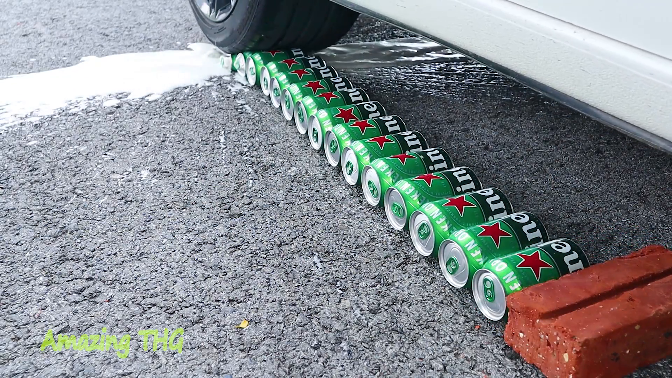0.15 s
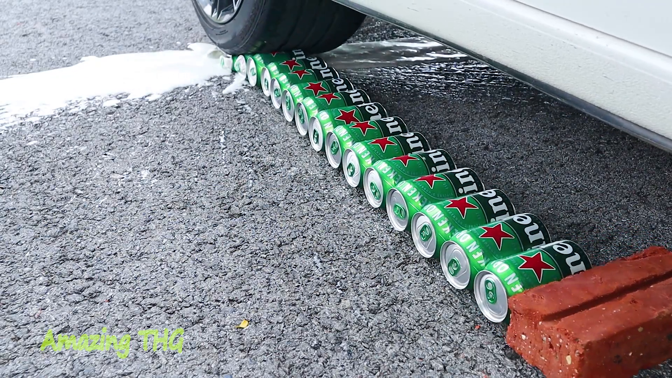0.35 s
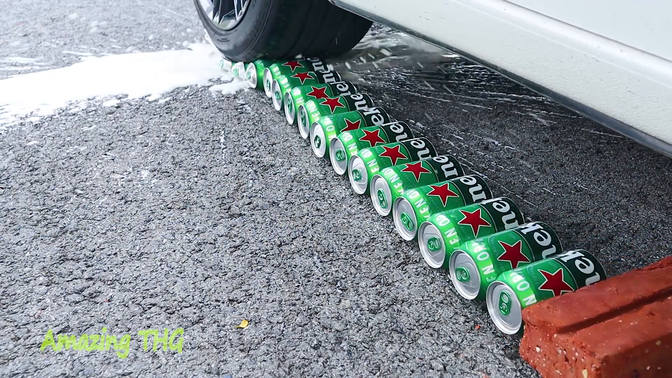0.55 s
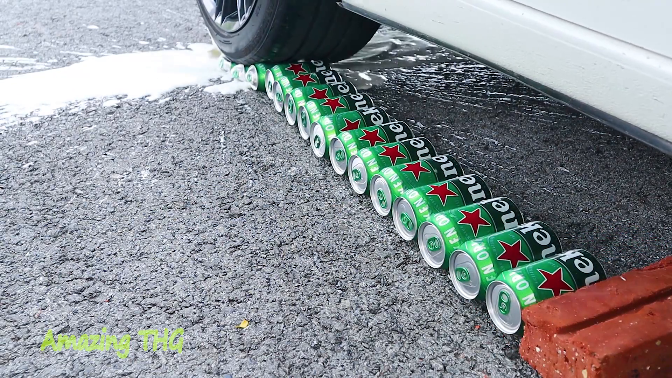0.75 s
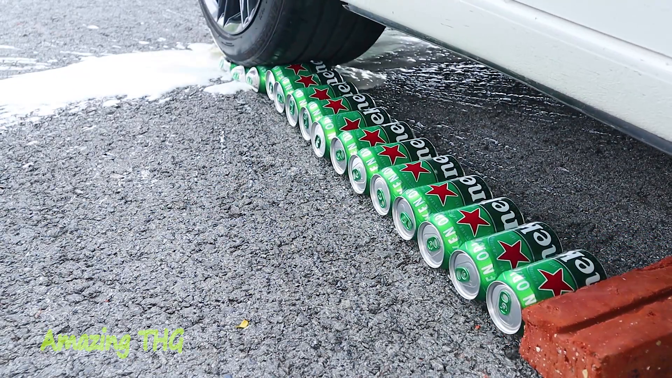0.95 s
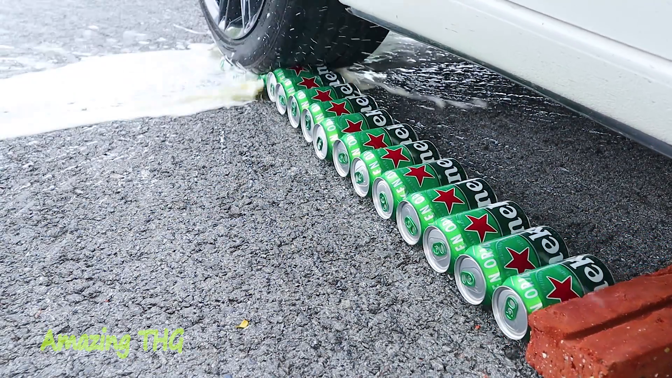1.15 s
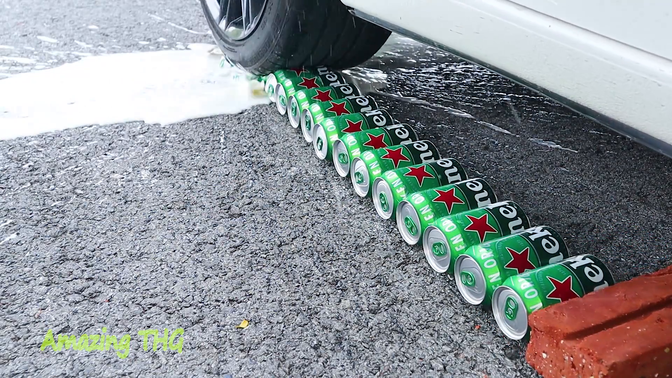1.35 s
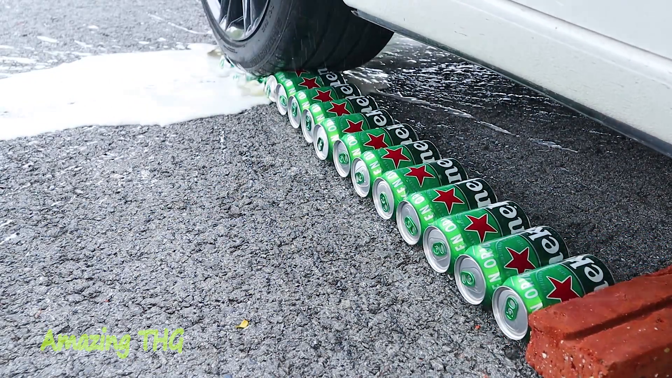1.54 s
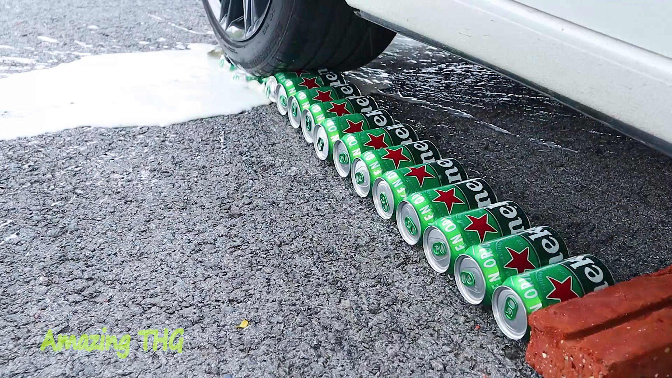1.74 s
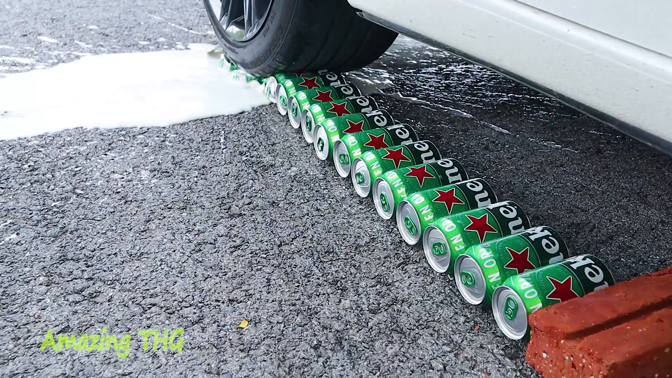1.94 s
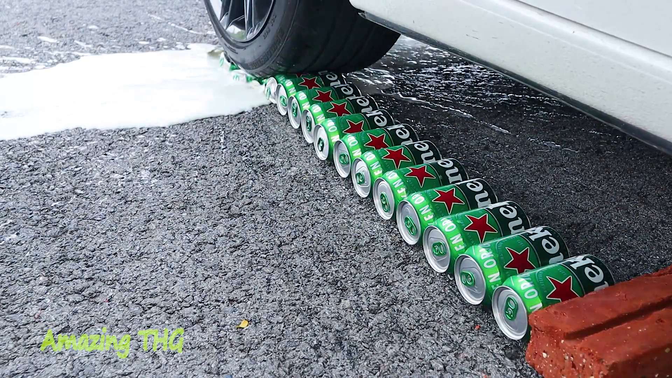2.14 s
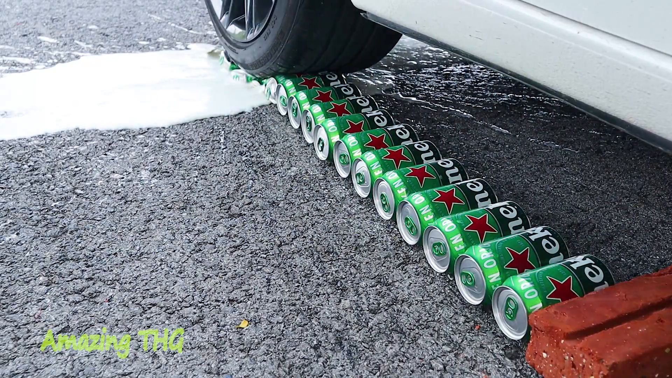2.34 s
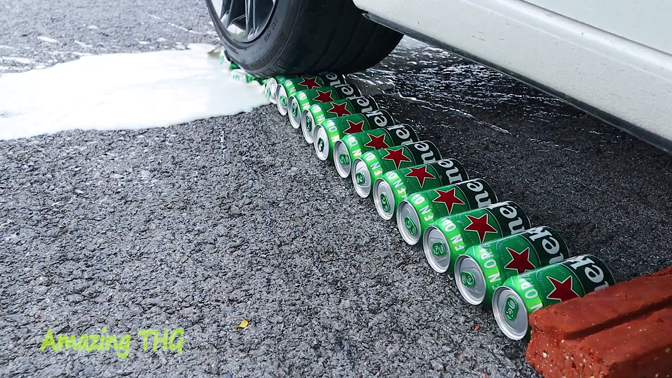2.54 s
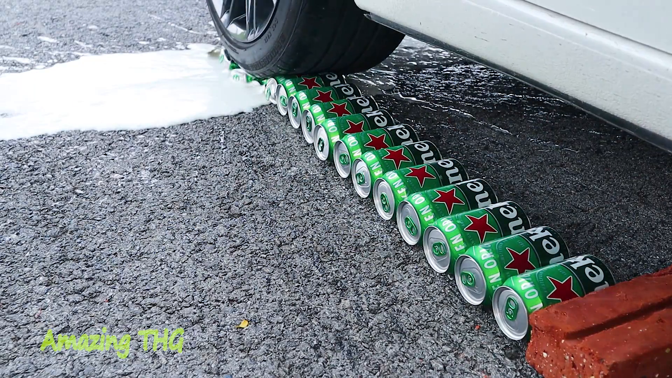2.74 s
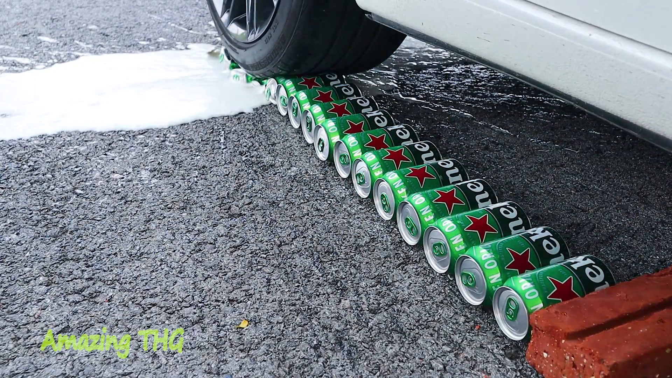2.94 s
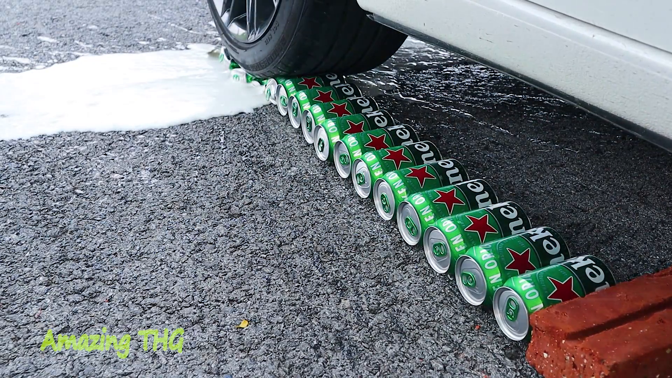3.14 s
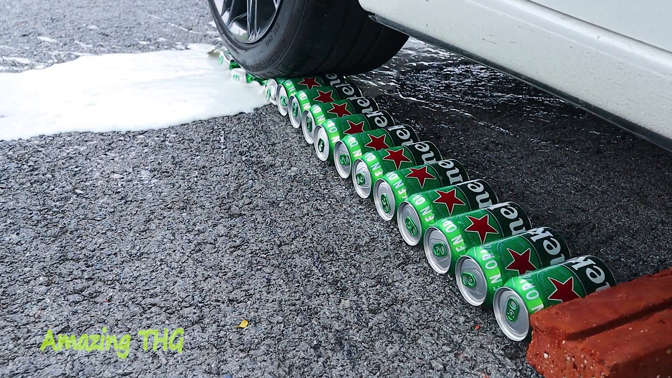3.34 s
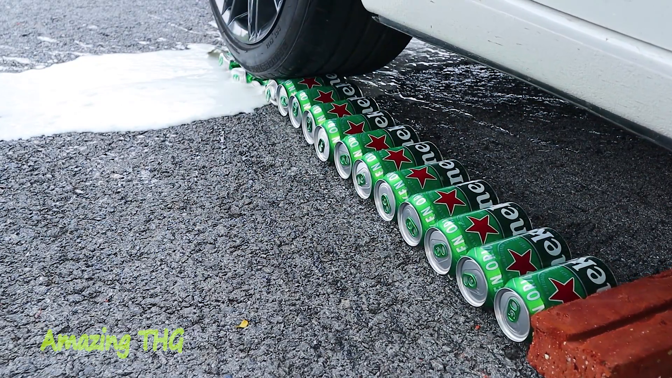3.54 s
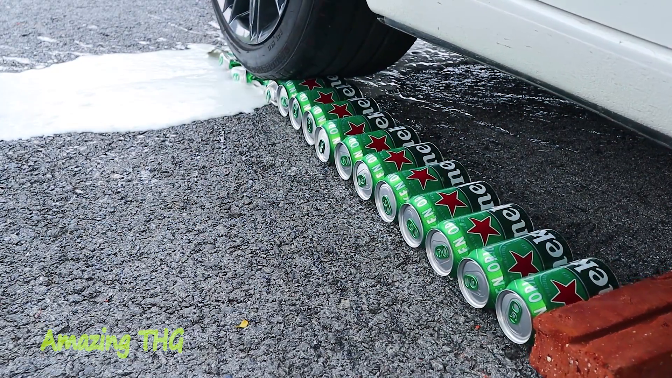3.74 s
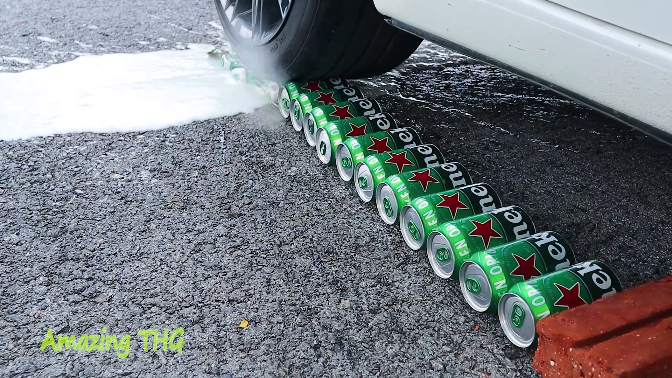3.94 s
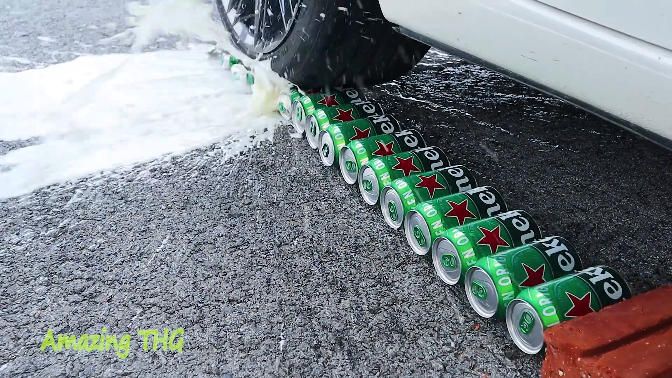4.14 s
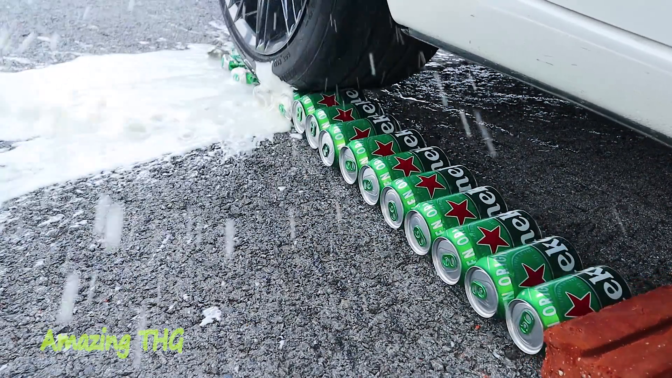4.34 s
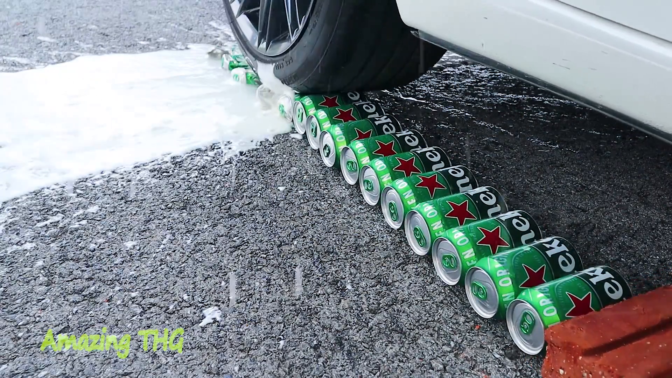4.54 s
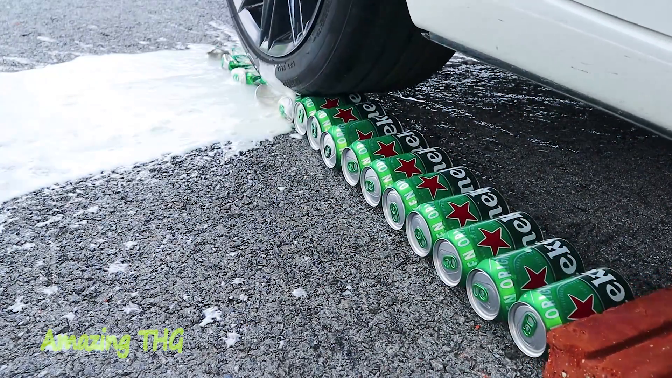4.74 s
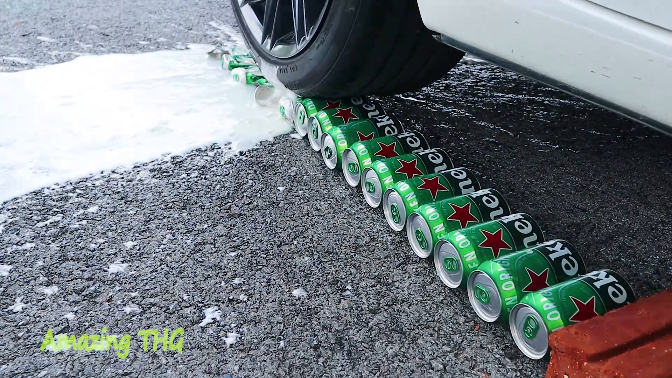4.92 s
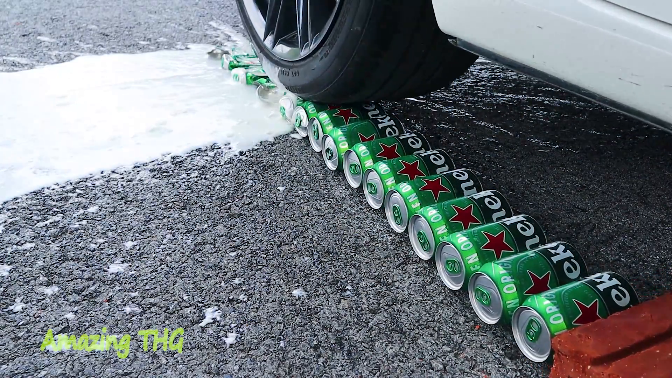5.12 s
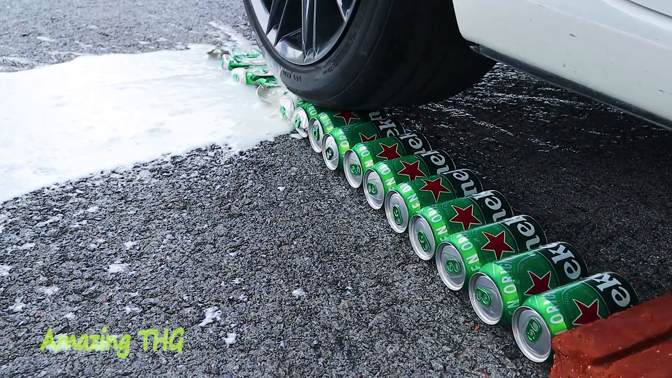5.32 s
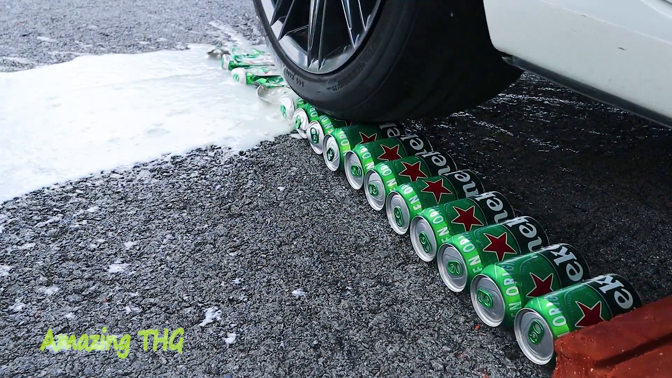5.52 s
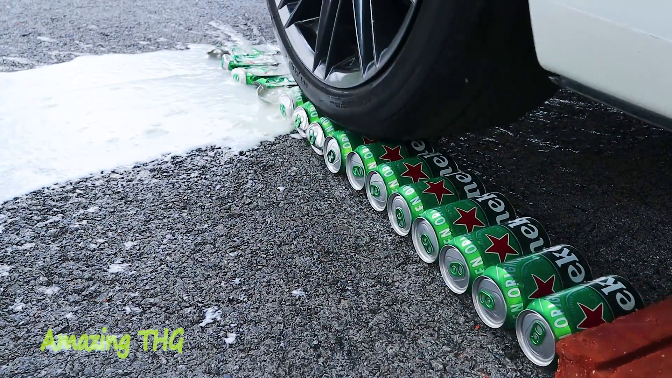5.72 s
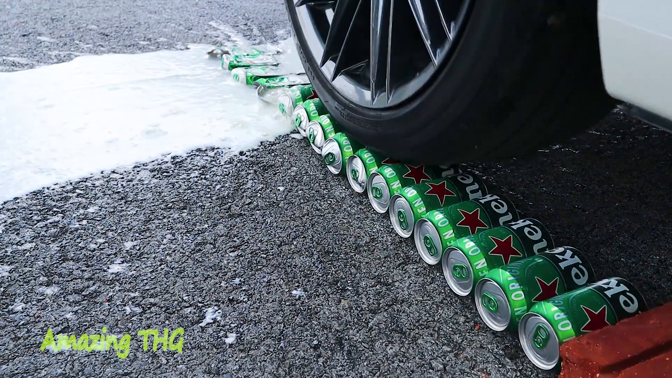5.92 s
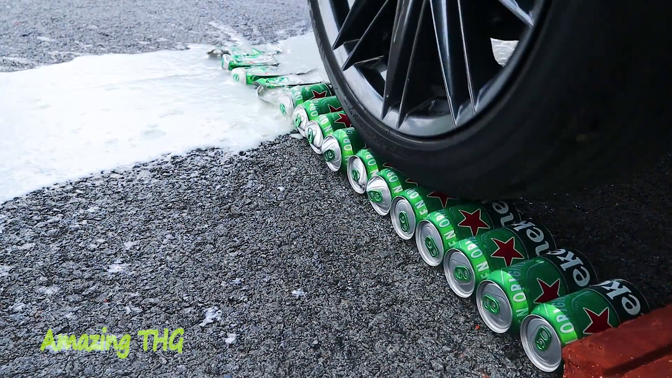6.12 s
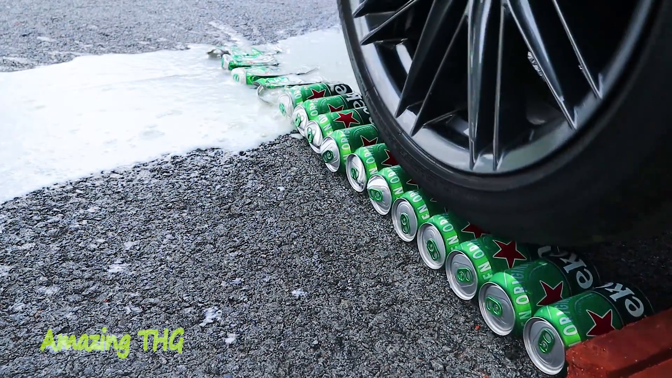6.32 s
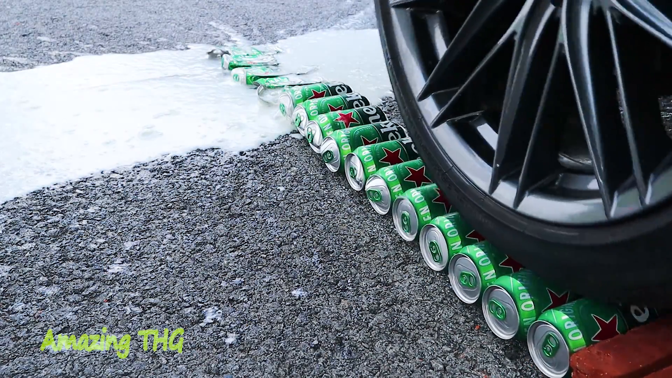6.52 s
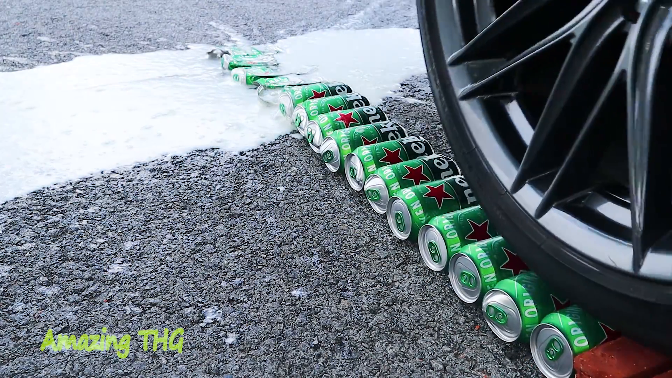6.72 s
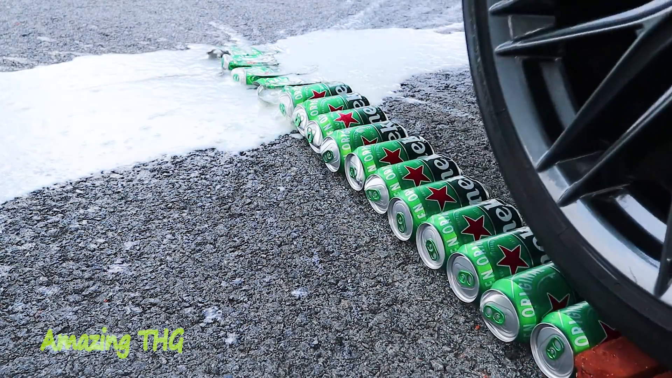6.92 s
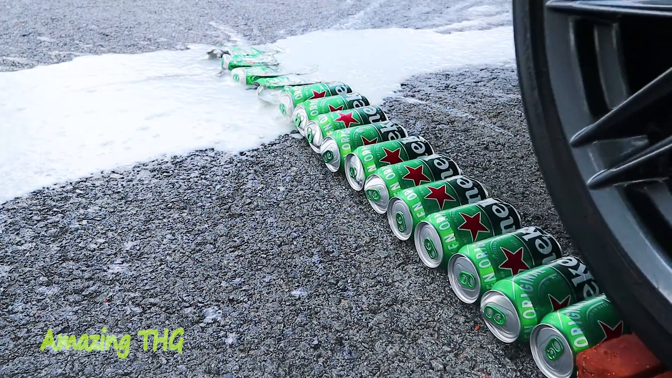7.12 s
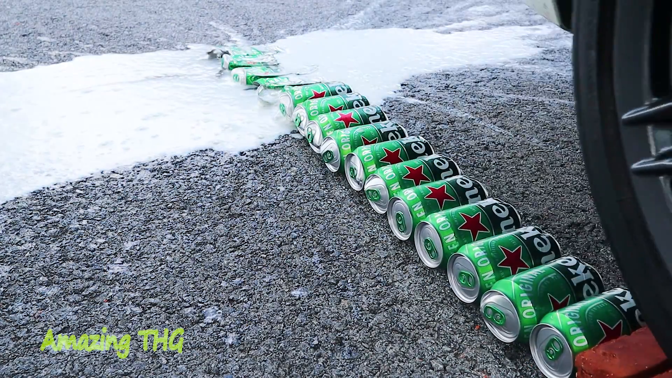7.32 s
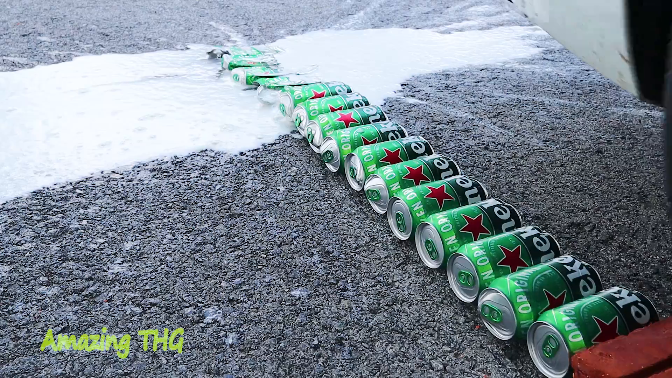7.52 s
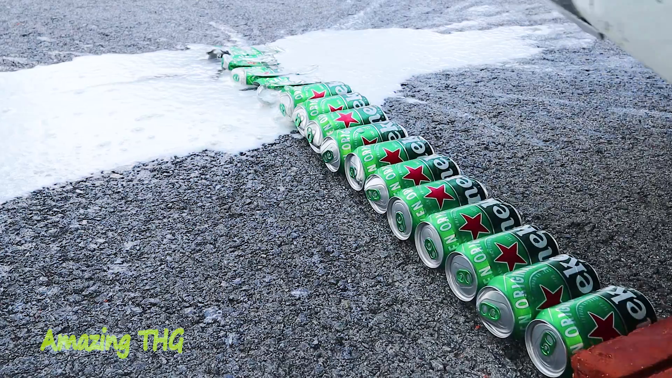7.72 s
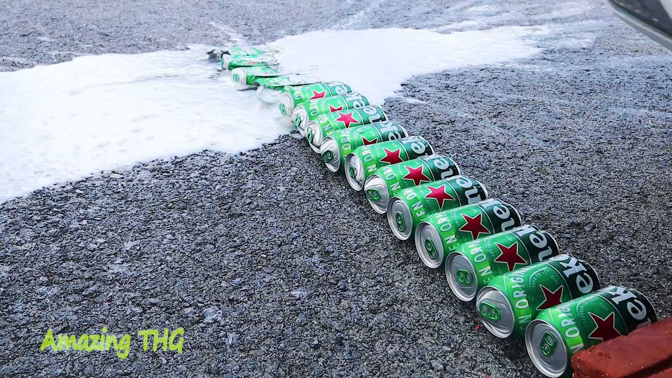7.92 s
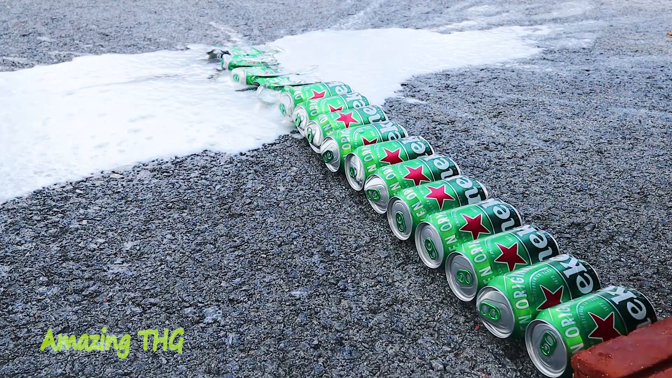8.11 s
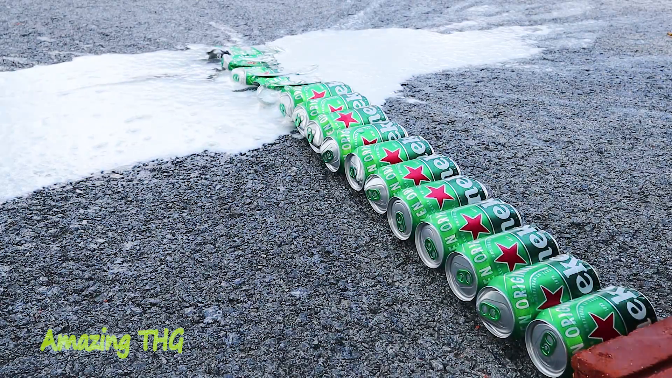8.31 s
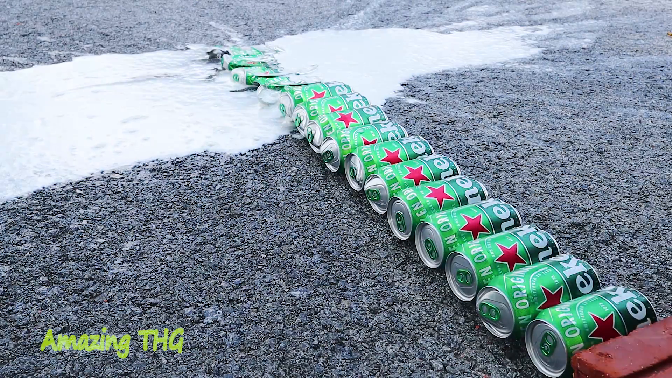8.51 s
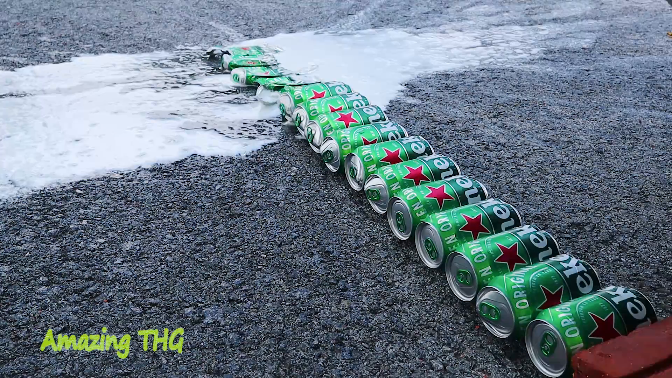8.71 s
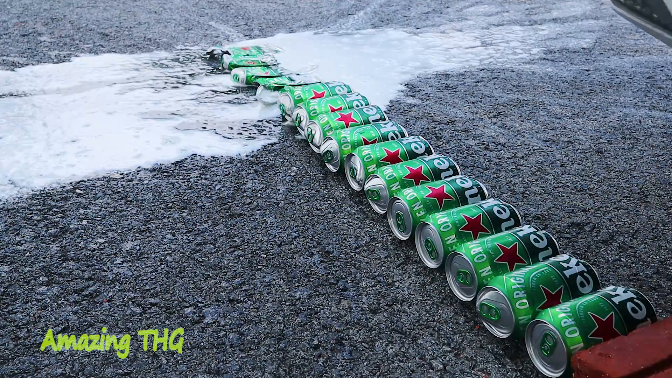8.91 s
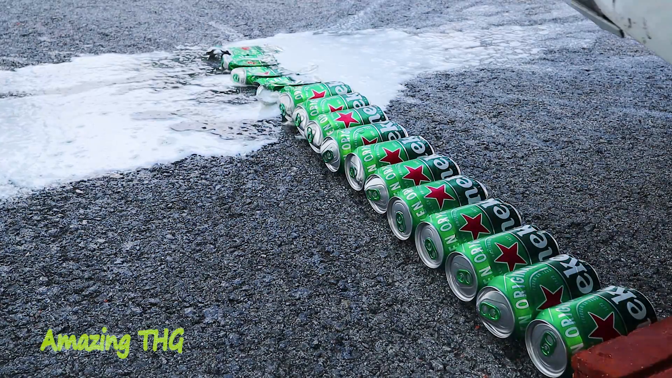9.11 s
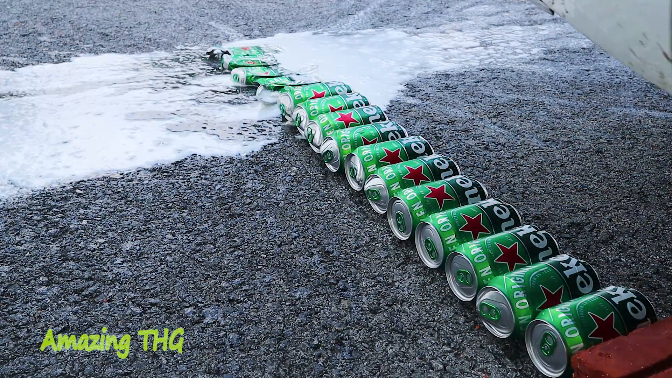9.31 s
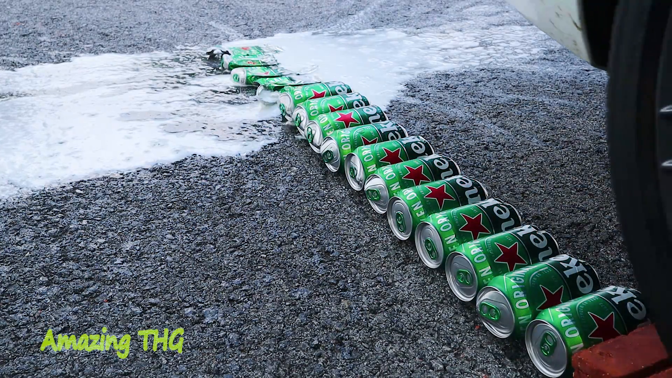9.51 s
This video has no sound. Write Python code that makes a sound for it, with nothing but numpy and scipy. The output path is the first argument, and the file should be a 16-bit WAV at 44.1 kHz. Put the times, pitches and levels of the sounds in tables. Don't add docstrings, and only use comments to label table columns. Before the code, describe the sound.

Close, overloaded cracks and wet pops of crushed drink cans, with clinks, ticks and fizz, thin out to a soft idle and faint ratchet clicks.

```python
import sys
import numpy as np
from scipy import signal
from scipy.io import wavfile
from scipy.ndimage import uniform_filter1d

SR = 44100
rng = np.random.default_rng(int(sys.argv[2]) if len(sys.argv) > 2 else 0)


def persist_wave(psi):
    counts = np.round(np.clip(psi, -1, 1) * 32767).astype(np.int16)
    wavfile.write(sys.argv[1], SR, np.atleast_2d(counts).T)


def volts(x):
    e = np.asarray(x, float) / 20
    return 10 ** e


N = 421596


def ring(x, hz, width_hz):
    return signal.lfilter(*signal.iirpeak(min(hz, .45 * SR), hz / width_hz, SR), x)


def band(x, lo_hz, hi_hz, order=2):
    return signal.sosfilt(signal.butter(order, [lo_hz, min(hi_hz, .45 * SR)], "band", fs=SR, output="sos"), x)


def peak(x, db):
    return x * volts(db) / np.max(np.abs(x))


def add(out, s, x):
    i = max(int(s * SR), 0)
    out[i:i + len(x)] += x[:N - i]


def fade(t, t60):
    return np.exp(-np.log(1000) * t / max(t60, .004))


def curve(table):
    s, *columns = np.transpose(table)
    return [np.interp(np.arange(N) / SR, s, c) for c in columns]


def walk(rate):
    k = int(SR / rate)
    held = np.repeat(rng.standard_normal(N // k + 1), k)
    return 1.3 * uniform_filter1d(uniform_filter1d(held, k), k)[:N]


def struck(modes, t, phases):
    return sum(volts(db) * fade(t, t60) * np.sin(2 * np.pi * (hz * t + p)) for (hz, db, t60), p in zip(modes, phases))


def can(rows, size, rise, snap, kick, width, rattle_db, body_db, treble_db, treble_t, panel_count=0):
    out, t = np.zeros(N), np.arange(size) / SR
    chance = rng.standard_normal((len(rows), 2, size))
    for (s, db, hz, low_db, high_db, top_db, t60), (noise, lump) in zip(rows, chance):
        lumps = volts(24 * uniform_filter1d(lump, size=90))
        head = (1 - np.exp(-t / rise)) ** 2 * np.exp(-t / snap)
        push = noise * (head + volts(rattle_db) * lumps * fade(t, t60))
        push -= kick * np.exp(-((t - 1.5 * rise) * hz * 5) ** 2)
        broad_hz = max(hz, 1500)
        wall = ring(ring(push, hz, width * hz), hz, 2.0 * width * hz)
        wall += .36 * band(push, 0.66 * broad_hz, 1.844 * broad_hz)
        wall += 0.012 / t60 * ring(push * fade(t, .5 * t60), 3000, 1300)
        panels = hz * 2 ** np.minimum(.6 * np.abs(lump[:panel_count]), 1.1)
        wall += volts(-10) * sum(ring(push, f, 7 / t60 + .02 * f) for f in panels)
        body = ring(push, 720, 760) + 0.15 * band(push, 230, 430, order=3)
        wall, body = band(wall, 200, max(4000, 1.7 * hz)), band(body, 120, 2600)
        sharp = push * (fade(t, treble_t * t60) + .015)
        edge, top = band(sharp, 3300, 7000), band(sharp, 7000, 15000)
        low = peak(wall, db) + peak(body, db + low_db + body_db)
        add(out, s, low + peak(edge, db + high_db + treble_db) - peak(top, db + top_db + treble_db))
    return out


# t/s, level/dB (peak), f/Hz (ring), body/dB, t60/s (rattle)
CRACKS = [
    (0.4679, 3, 1504, -12.5, 0.36),
    (1.5916, -3.5, 1453, -23, 0.23),
    (4.071, -5, 1603, -17, 0.35),
    (5.597, 1.5, 1479, -16.5, 0.15),
    (5.859, 2.5, 1503, -19.5, 0.11),
    (6.001, 2, 1534, -20, 0.11),
    (6.159, 0.5, 1563, -20.5, 0.13),
]
# t/s, level/dB (peak), f/Hz (ring), body/dB, t60/s (rattle)
BUCKLES = [
    (0.5032, -3, 1820, -15, 0.07),
    (0.5765, -6.5, 1452, -19.5, 0.27),
    (1.428, 2, 1626, -20.5, 0.089),
    (5.1897, 2.5, 1504, -18.5, 0.18),
    (5.656, -3.5, 1383, -24, 0.13),
    (6.691, 6, 1560, -20.5, 0.089),
]


def cracks():
    rows = [(s, db, hz, low_db, -19.5, -30.5, t60) for s, db, hz, low_db, t60 in CRACKS]
    rows += [(s, db, hz, low_db, -26, -35.5, t60) for s, db, hz, low_db, t60 in BUCKLES]
    return can(rows, size=16000, rise=.0008, snap=0.0038, kick=1.6, width=0.23, rattle_db=-16.5,
               body_db=13, treble_db=0, treble_t=.55, panel_count=5)


# t/s, level/dB (peak), f/Hz (ring), treble/dB, t60/s (rattle)
BURSTS = [
    (1.123, -2, 1480, -12, 0.2),
    (4.0488, 2, 1311, -15.5, 0.17),
]


def bursts():
    rows = [(s, db, hz, -6, high_db, high_db - 8, t60) for s, db, hz, high_db, t60 in BURSTS]
    return can(rows, size=16000, rise=.001, snap=.0013, kick=.1, width=.6, rattle_db=-34,
               body_db=9, treble_db=3, treble_t=.8, panel_count=4)


# t/s, level/dB (peak), f/Hz (swing), air push/dB
POPS = [
    (0.4683, -8, 604.6, -61),
    (1.1248, 3, 901.7, -38.5),
    (4.0493, 4.5, 571, -28),
]


def pops():
    out, t = np.zeros(N), np.arange(SR // 3) / SR
    shove = np.sin(2 * np.pi * 45 * t) * np.exp(-t / 0.005)
    for s, db, hz, air_db in POPS:
        swing = -np.sin(2 * np.pi * hz * t) * t * np.exp(-t * hz / 0.26)
        add(out, s, peak(band(swing, 420, 5900), db) + peak(shove, air_db))
    return out


# t/s, level/dB (peak), f/Hz (ring), t60/s
AFTERS = [(.251, -28, 1555, 0.039), (0.505, 1, 1795, 0.0091), (0.5769, -8.5, 1360, 0.023),
          (1.127, -8.5, 1290, 0.0094), (1.131, -21.5, 1490, 0.02), (1.4327, -12.5, 1550, 0.028),
          (1.591, -8, 1517, 0.027), (4.076, -11, 1570, 0.019), (4.107, -24.5, 1700, 0.072),
          (5.1909, -4.5, 1565, .03), (5.599, -14.5, 1320, 0.054), (5.863, -7, 1440, 0.041),
          (6.003, -13, 1507, 0.038), (6.161, -11, 1395, 0.065), (6.692, -9, 1402, 0.048)]


def second_folds():
    out, t = np.zeros(N), np.arange(4096) / SR
    for s, db, hz, t60 in AFTERS:
        modes = [(hz, db, t60), (hz * 1.23, db - 9.5, t60), (hz * 2.5, db - 13.5, t60 / 2)]
        add(out, s, (1 - np.exp(-t * hz)) * struck(modes, t, [0, .3, .6]))
    return out


# t/s, level/dB
THUMPS = [(0, -34.5), (.47, -21), (0.579, -39), (0.681, -36.5), (1.125, -48), (1.432, -34), (1.591, -37),
          (2.065, -37), (4.048, -29), (5.189, -40), (5.597, -35), (5.86, -39), (5.998, -38.5), (6.158, -40),
          (6.689, -37.5)]
# f/Hz, level/dB, t60/s
TYRE = [
    (213.3, -5, 0.55),
    (394, -18, 0.21),
    (663, -14.5, 0.41),
]
# f/Hz, level/dB, t60/s
THUD = (120, -9, 0.089)
# t/s, level/dB
RIM = [
    (5.25, -52.5),
    (6.05, -64),
    (6.2, -56),
    (6.72, -56),
]


def wheel():
    out, t = np.zeros(N), np.arange(SR // 2) / SR
    for (s, db), p in zip(THUMPS, rng.random((len(THUMPS), len(TYRE)))):
        add(out, s, volts(db) * (1 - np.exp(-t / 0.0037)) * (struck(TYRE, t, p) + struck([THUD], t, p)))
    for s, db in RIM:
        add(out, s, volts(db) * t / 0.02 * np.exp(1 - t / 0.037) * np.sin(2 * np.pi * 614 * t))
    return out


# t/s, level/dB (peak), f/Hz (ring), body/dB
KNOCKS = [(0.068, -36, 856, -26), (0.36, -29, 860, -23), (0.676, -25.5, 560, -13.5),
          (0.751, -42, 724, -6.5), (2.644, -43, 634, -31), (2.691, -40.5, 1490, -9),
          (2.977, -26.5, 1230, -19), (3.04, -21.5, 1650, -18.5), (4.189, -40, 700, -18),
          (4.291, -34, 1277, -14.5), (4.613, -25.5, 1090, -21.5), (4.719, -37, 630, -15),
          (5.012, -26.5, 1030, -24.5), (5.114, -32.5, 703, -29), (5.27, -29, 1280, -9),
          (5.745, -27, 1640, -16), (6.953, -19.5, 2024, -35), (7.497, -47.5, 550, -4.5),
          (9.549, -55, 592, -7)]
# t/s, level/dB (peak), f/Hz (ring), body/dB, treble/dB
CLINKS = [(0.054, -28, 1610, -38, -35), (0.237, -33, 1520, -19, -14), (0.248, -26, 1590, -41, -19),
          (0.417, -32.5, 1860, -13.5, -29), (0.913, -36, 1610, -21, -8), (1.338, -26, 2330, -29, -2.5),
          (1.916, -29, 1700, -26, -0.5), (2.066, -17.5, 1465, -19.5, -15), (2.363, -49, 1970, 1, -31),
          (3.817, -25.5, 1760, -33, -33), (4.124, -24, 1340, -17, -8), (4.5407, -21.5, 2750, -39, -28),
          (4.689, -35.5, 1510, -17, -16), (6.487, -42, 1230, -23, -21), (6.831, -28, 1900, -36, -28),
          (7.589, -52.5, 2456, -3.5, -18.5)]


def knocks():
    t60 = 0.18
    rows = [(*row, -60, -68, t60) for row in KNOCKS] + [(*row, row[4] - 4, t60) for row in CLINKS]
    return can(rows, size=8000, rise=0.00033, snap=0.003, kick=2, width=0.3, rattle_db=-11.5,
               body_db=16, treble_db=-6, treble_t=.45)


# t/s, level/dB (peak), f/Hz (ring), edge/dB
TICKS = [(0.092, -34, 1800, -11), (0.27, -28.5, 1650, -17), (0.3106, -30, 1880, -22),
         (0.3235, -27.5, 1860, -26), (0.33, -42, 3030, -24), (0.336, -34, 1780, -24),
         (0.365, -48, 4900, -10), (0.384, -31.5, 1310, -23), (1.243, -27, 3200, 4),
         (1.2674, -29.5, 3100, 6.5), (1.289, -30.5, 2180, -40), (1.313, -31, 2430, -7),
         (1.561, -26, 3300, -6), (1.929, -25, 3430, -26), (1.962, -38, 2290, -5), (1.986, -37, 3300, -5),
         (2.2277, -45, 3500, -3), (2.925, -34.5, 1770, -35), (3.6235, -30.5, 1420, -20),
         (3.701, -40, 1000, -16), (3.8579, -27.5, 1670, -43), (4.396, -34, 1440, -37),
         (4.467, -34.5, 1480, -21), (4.4958, -34.5, 1200, -28), (4.596, -35, 1710, -29.5),
         (4.8224, -32.5, 2520, -15), (4.9208, -34, 1830, -14.5), (5.7838, -29, 2770, -14),
         (7.4256, -35, 1760, -31)]
# t/s, level/dB (peak), f/Hz (ring), fizz/dB
SPLASHES = [(0.715, -39, 3000, -20), (1.0945, -22, 2200, -40), (1.75, -27.5, 4200, -26),
            (1.7714, -27.5, 3880, -30), (3.7245, -37.5, 1340, -17), (3.744, -52, 5500, -5),
            (3.816, -39, 4000, -30), (3.927, -28, 1720, -27), (4.184, -30.5, 2800, -32),
            (4.4109, -45, 1560, -5), (4.5119, -33.5, 2680, -19), (4.7387, -38.5, 890, -20),
            (5.456, -47.5, 1470, 4), (5.774, -49, 2580, 3), (5.93, -50, 5000, -22), (6.081, -58, 4500, 13),
            (6.67, -33, 1996, -17), (6.6816, -51, 4870, 10), (6.735, -50, 4970, 4), (6.857, -49.5, 5030, 2),
            (7.428, -36.5, 4290, -20.5)]


def ticks():
    rows = [(s, db, hz, -22, edge_db, edge_db - 21, .04) for s, db, hz, edge_db in TICKS]
    rows += [(s, db, hz, -22, min(fizz_db, -1), fizz_db, .04) for s, db, hz, fizz_db in SPLASHES]
    return can(rows, size=3000, rise=0.00035, snap=.0014, kick=1.5, width=0.5, rattle_db=-13.5,
               body_db=12, treble_db=2, treble_t=.8)


# t/s, level/dB, f/Hz, t60/s
PINGS = [(1.105, -46, 2500, .08), (1.2442, -20, 3310, .033), (1.2685, -30, 3320, .038),
         (1.43, -40, 3950, .1), (1.561, -43, 7400, .04), (1.562, -44, 6400, .035), (1.563, -43, 3600, .045),
         (1.699, -47, 5850, .025), (1.749, -40, 3300, .04), (1.771, -40, 3400, .05),
         (1.772, -42, 7700, .03), (1.988, -48, 3300, .05), (4.075, -35, 1281, .4), (4.075, -40, 641, .75),
         (6.955, -42, 3550, .06)]


def lids():
    out, t = np.zeros(N), np.arange(SR // 3) / SR
    for s, db, hz, t60 in PINGS:
        add(out, s, (1 - np.exp(-t / 0.00025)) * struck([(hz, db, t60)], t, [0]))
    return out


# f/Hz, level/dB, t60/s
LEFTOVER = [
    (640, -45.5, 0.42),
    (1360, -42.5, .3),
    (2240, -48.5, .3),
]


def leftover():
    out = np.zeros(N)
    add(out, 0, struck(LEFTOVER, np.arange(SR // 2) / SR, [0, .2, .7]))
    return out


SPRAY_S = [.469, .505, .577, 1.126, 1.16, 1.27, 1.34, 1.43, 1.561, 1.592, 1.917, 1.987, 3.966, 4.051, 4.14,
           4.706, 4.849, 5.191, 5.598, 5.657, 5.774, 5.86, 6.001, 6.078, 6.159, 6.691]
# hold/s, t60/s (fall), level/dB
SPRAYS = [(0.035, 0.12, -43.5), (0.015, 0.086, -48), (0.0081, 0.15, -43.5), (0.0054, 0.036, -41.5),
          (0.039, 0.37, -54), (.05, .2, -60), (.008, 0.087, -56), (.006, .08, -45.5), (0.013, .03, -55),
          (0.016, 0.12, -50), (.01, 0.14, -58.5), (0.0079, .04, -56), (.004, .1, -57), (0.07, 0.1, -49),
          (0.046, .12, -62), (0.0065, .06, -54), (.005, .05, -60), (.006, 0.1, -39.5), (.008, .14, -44.5),
          (.006, 0.11, -55), (.01, 0.063, -56), (0.0081, 0.067, -41), (0.008, 0.091, -46),
          (.006, 0.046, -61), (0.0076, 0.1, -47.5), (0.0046, 0.079, -47.5)]


def foam():
    jet, t = np.zeros(N), np.arange(SR // 2) / SR
    for s, (hold, t60, db) in zip(SPRAY_S, SPRAYS):
        add(jet, s, volts(db) * np.minimum(1, t / 0.0018) * fade(np.maximum(t - hold, 0), t60))
    fizz = volts(2.5 * rng.exponential(size=N)) * rng.standard_normal(N)
    fizz = signal.lfilter(*signal.butter(1, 4500, fs=SR), band(fizz, 3000, 15000))
    return jet * fizz / np.std(fizz)


# t/s, length/s, f/Hz, width/Hz, level/dB
RASPS = [
    (5.455, .085, 2840, 500, -61),
    (5.45, .11, 1600, 1500, -58.5),
    (6.49, .13, 1730, 840, -54),
    (6.4, .18, 2250, 1400, -58),
    (5.81, .05, 4200, 1200, -53),
]


def rasps():
    out = np.zeros(N)
    for (s, length, hz, width_hz, db), noise in zip(RASPS, rng.standard_normal((len(RASPS), 8192))):
        gas = ring(ring(noise, hz, width_hz), hz, width_hz)[:int(length * SR)]
        add(out, s, volts(db) * np.hanning(len(gas)) ** .5 * gas / np.std(gas))
    return out


def whistles(rows, fall):
    out, waver = np.zeros(N), walk(190)
    for s, length, hz, db in rows:
        n = int(length * SR)
        shake = waver[int(s * SR):][:n]
        phase = 2 * np.pi * np.cumsum(np.linspace(hz, fall * hz, n) * (1 + .006 * shake)) / SR
        add(out, s, volts(db + 1.2 * shake) * np.hanning(n) ** .5 * np.sin(phase))
    return out


# t/s, length/s, f/Hz, level/dB
SQUEAKS = [
    (.42, 0.057, 2460, -49),
    (3.767, 0.033, 2490, -53),
    (3.887, 0.045, 2550, -56),
    (3.99, 0.05, 2500, -54),
    (4.79, 0.057, 2510, -52),
    (5.435, 0.033, 2500, -58.5),
    (5.035, .065, 2530, -60),
    (6.46, 0.029, 2510, -54),
    (7.57, 0.044, 2476, -56.5),
]


def squeaks():
    return whistles(SQUEAKS, 1)


# t/s, level/dB (peak)
SLIPS = [(3.205, -33), (3.299, -35.5), (3.364, -36.5), (3.404, -38), (3.464, -36), (3.501, -37),
         (3.524, -39), (3.543, -40), (3.564, -39.5), (3.597, -40), (3.613, -39.5), (3.64, -45),
         (3.655, -42), (3.667, -45), (3.677, -43.5)]
# f/Hz, width/Hz, level/dB
SLIP_MODES = [(1510, 660, 10), (667, 490, 2.5)]


def rubber():
    kicks = np.zeros(N)
    for s, db in SLIPS:
        add(kicks, s + 0.00052, volts(db + 12.5) * np.hanning(13))
    kicks = kicks + 0.17 * np.roll(kicks, int(0.00395 * SR)) + 0.067 * np.roll(kicks, int(0.011 * SR))
    return -sum(volts(db) * ring(ring(kicks, hz, w), hz, 2 * w) for hz, w, db in SLIP_MODES)


def clicks(rate, jitter, scatter_db):
    at = np.flatnonzero(np.diff(np.floor(np.cumsum(rate * (1 + jitter * walk(60))) / SR)))
    out = np.zeros(N)
    out[at] = volts(scatter_db * rng.standard_normal(N)[at])
    return out


# t/s, length/s, slips per s, f/Hz (first ring), level/dB
CREAK = [
    (.095, .15, 165, 2700, -44),
    (5.8, .062, 450, 2900, -52),
]


def creak_shape():
    rate, hz, gain = np.full(N, 100.), np.full(N, 3000.), np.zeros(N)
    for s, length, per_s, first_hz, db in CREAK:
        i, t = int(s * SR), np.arange(int(length * SR)) / SR
        rate[i:i + len(t)] = per_s
        hz[i:i + len(t)] = first_hz * 1.5 ** np.sqrt(t / length)
        gain[i:i + len(t)] = volts(db) * np.minimum(1, np.minimum(t, length - t) / .014) ** 2
    return rate, hz * (1 + .015 * walk(400)), gain


def creaks():
    rate, hz, gain = creak_shape()
    slips = gain * clicks(rate, jitter=.04, scatter_db=1.5)
    puff = signal.fftconvolve(slips, np.hanning(80))[:N]
    rough = 1 + 0.37 * band(rng.standard_normal(N), 100, 1200)
    climbing = 1.5 * puff * rough * np.sin(2 * np.pi * np.cumsum(hz) / SR)
    slips = slips * np.clip((4200 - hz) / 800, .2, 1)
    steady = volts(17) * ring(ring(slips * (hz < 3600), 6200, 900), 6200, 1200)
    steady += volts(38) * ring(ring(slips, 2150, 350), 2150, 500)
    steady += volts(24) * ring(ring(slips, 750, 400), 750, 600)
    return climbing + steady + volts(27) * band(slips, 500, 3100, order=4)


# t/s, level/dB (peak), f/Hz (centre)
SNAPS = [(0.2658, -38, 2200), (0.311, -35, 2700), (0.324, -37, 2800), (.33, -37, 2900), (0.369, -32, 900),
         (.893, -46, 4500), (.9398, -45, 8000), (1.0331, -44, 5500), (3.9659, -37.5, 6000),
         (4.5401, -20.5, 2900), (4.6194, -40, 4700), (4.67, -41, 5000), (4.706, -39, 9000),
         (4.758, -50, 4500), (4.781, -48, 5460), (5.0116, -28.5, 2520), (5.4392, -48, 11000),
         (5.696, -52, 11000), (5.803, -48, 11000), (6.217, -51, 10000), (6.567, -52, 6400),
         (6.583, -47, 6000), (6.601, -50, 10100), (6.774, -46, 11000), (6.7801, -39, 4200)]


def snaps():
    out, t = np.zeros(N), np.arange(4096) / SR
    for (s, db, hz), noise in zip(SNAPS, rng.standard_normal((len(SNAPS), 4096))):
        add(out, s, peak(band((1 + noise) * np.exp(-t / 0.00077), hz / 2.2, hz * 1.45, order=1), db))
    return out


# t/s, level/dB (peak), f/Hz
CHIPS = [(.093, -43, 5000), (.366, -43, 5170), (1.05, -38.5, 2500), (1.095, -37, 920), (1.289, -29, 2480),
         (1.312, -37, 2510), (1.34, -26, 4300), (1.345, -35.5, 970), (1.505, -50, 4000), (1.53, -53, 5900),
         (1.771, -35, 2400), (1.847, -40.5, 3700), (1.92, -30.5, 2400), (1.932, -34, 3400),
         (2.012, -44.5, 3600), (2.132, -47, 3300), (2.145, -48, 3200), (2.228, -43, 3660),
         (2.235, -40.5, 3150), (2.248, -50, 3330), (2.364, -34.5, 1900), (4.152, -30, 900),
         (2.429, -48, 3400), (2.646, -43, 1550), (3.624, -40.5, 4300), (3.817, -29, 4230),
         (4.506, -45, 1000), (4.534, -43, 1000), (4.635, -36, 1500), (4.65, -43, 3500), (4.67, -42, 3200),
         (4.707, -35, 1630), (4.722, -39, 2300), (4.739, -39, 3100), (4.758, -46, 2900), (4.827, -43, 900),
         (4.828, -41, 3500), (4.889, -48, 590), (5.752, -25, 1770), (6.307, -49.5, 320), (6.46, -52, 297),
         (6.497, -41, 1240), (6.655, -40, 3500), (6.801, -34.5, 1850)]


def chips():
    out, t = np.zeros(N), np.arange(2048) / SR
    for s, db, hz in CHIPS:
        t60 = 28 / hz
        modes = [(hz, db, t60), (1.13 * hz, db - 5, t60)]
        add(out, s, (1 - np.exp(-2 * t * hz)) * struck(modes, t, [0, 0]))
    return out


# t/s, cycles per s, level/dB (exhaust)
IDLE = [(0, 25, -73), (.5, 26, -73.5), (3, 23.4, -78), (3.5, 23, -71), (4, 29, -70.5), (4.2, 22, -79),
        (5.5, 26, -73.5), (6.2, 28, -76), (7, 21.3, -83), (8.6, 17.6, -83.5), (8.75, 22.6, -82.5),
        (9.56, 19.2, -82)]
ORDERS_DB = [-10.5, -26, -0.5, -8.5, -3.5, -19.5, -11]


def engine():
    rate, db = curve(IDLE)
    turn = 2 * np.pi * np.cumsum(rate) / SR
    out = np.zeros(N)
    for k, order_db in enumerate(ORDERS_DB):
        out += np.sqrt(2) * volts(db + order_db + 0.5 * walk(14.0)) * np.sin((k + 1) * turn + k * k)
    return out


# t/s, level/dB
TAPS = [
    (7.86, -73),
    (8.1, -58),
    (8.65, -58),
    (9.1, -59),
    (9.4, -66),
]
# t/s, taps so far
TAP_COUNT = [
    (7.83, 0),
    (8.325, 10),
    (8.573, 15),
    (9.05, 25),
    (9.146, 27),
    (9.54, 35),
]


def valves():
    puffs = ((1 + np.cos(2 * np.pi * curve(TAP_COUNT)[0])) / 2) ** 3.5
    return volts(curve(TAPS)[0] + 17) * ring(ring(puffs * rng.standard_normal(N), 1000, 380), 960, 500)


# t/s, level/dB (peak)
PAWL = [
    (8.695, -44),
    (8.722, -36.5),
    (8.766, -36.5),
    (8.814, -40.5),
]
# f/Hz, level/dB, t60/s
PAWL_MODES = [(605, -1, 0.34), (940, 2, 0.28), (1080, 4.5, 0.098), (1320, -7, 0.73), (1510, 0, 0.33),
              (2026, 5, 0.066), (2610, -3, 0.039), (3645, -7.5, 0.43), (4370, -9, 0.056)]


def ratchet():
    out, t = np.zeros(N), np.arange(SR // 2) / SR
    for (s, db), noise in zip(PAWL, rng.standard_normal((len(PAWL), SR // 2))):
        scrape = noise * np.exp(-t / 0.024)
        rings = signal.fftconvolve(scrape * np.exp(-t / 0.0019), struck(PAWL_MODES, t, noise))[:len(t)]
        rings = rings * (1 + 6 * band(noise, 30, 160))
        rasp = band(scrape, 350, 2400, order=4) + .14 * band(scrape, 2400, 6000, order=4)
        add(out, s, peak(rings, db - 2.5) + peak(rasp, db - 4.5))
    return out


# t/s, length/s, f/Hz, level/dB
CHIRPS = [
    (7.864, 0.089, 3900, -68),
    (8.052, 0.088, 3845, -71.5),
]


def chirps():
    return whistles(CHIRPS, .94)


# t/s, fall/s, level/dB per third octave, f/Hz (centre)
GUSHES = [(0, 0.016, -53.5, 1950), (.06, 0.11, -59.5, 574), (.26, 0.044, -58.5, 2320),
          (.57, 0.1, -53.5, 2760), (.66, 0.089, -58, 601), (1.2, 0.22, -71, 12070),
          (1.29, 0.13, -56.5, 2825), (1.542, 0.035, -77, 595), (4.1, 0.052, -57.5, 1386),
          (4.1, 0.14, -73.5, 11920), (4.66, 0.19, -62.5, 2540), (5.829, 0.16, -61, 1096),
          (5.845, .03, -58.5, 3940), (6.541, 0.04, -57.5, 2780), (6.62, 0.25, -78, 12030),
          (6.671, 0.05, -55, 3133), (6.805, 0.017, -55.5, 3480)]


def gushes(hz):
    t, power = np.arange(0, N, 64) / SR, 0
    for s, fall, db, centre_hz in GUSHES:
        skirt_db = 6 * np.log2(hz / centre_hz) ** 2
        away = np.maximum(t - s, (s - t) / 0.55)
        power = power + volts(2 * (db - skirt_db)) * np.exp(-2 * away / fall)
    return power


# t/s, grit lift/dB
LOAD = [(0, 14.5), (1, 9), (1.7, 4), (3.5, 7), (4.2, 9.5), (5, 7.5), (5.4, 4.5), (6.3, 9), (7, 3.5),
        (7.5, 4), (7.7, -0.64), (9.56, -1)]
# f/Hz, level/dB per Hz
BED_COLOUR = [(40, -12.5), (300, -9.5), (1500, -10), (3600, -19.5), (4600, -27), (7000, -30), (12000, -30),
              (15000, -31)]


def street():
    load_db = curve(LOAD)[0][::64]
    stress_db = np.repeat(load_db + 10 * np.log10(1 + gushes(2000) / volts(-128)), 64)[:N]
    grit = volts(2.0 * rng.exponential(size=N) + 0.17 * stress_db * walk(150))
    grit /= np.sqrt(uniform_filter1d(grit ** 2, size=8192))
    out = np.zeros(N)
    f, colour = np.transpose(BED_COLOUR)
    for hz in 39 * 2 ** (np.arange(27) / 3):
        reach = min(1, hz / 600, 4800 / hz)
        db = np.interp(np.log(hz), np.log(f), colour) + 10 * np.log10(hz) - 93.5 + reach * load_db
        noise = band(grit * rng.standard_normal(N), hz / 1.13, hz * 1.13)
        level = np.sqrt(volts(2 * db) + gushes(hz)) / np.std(noise)
        out += np.repeat(level, 64)[:N] * noise
    return out


def scene():
    cans = band(cracks() + bursts() + knocks() + ticks(), 150, 19000)
    cans += pops() + second_folds() + lids() + leftover()
    tyre = wheel() + rubber() + creaks()
    spill = foam() + rasps() + squeaks() + snaps() + chips()
    background = engine() + valves() + ratchet() + chirps() + street()
    return (cans + tyre + spill + background)[None]


def low_pass(x):
    return signal.sosfilt(signal.butter(12, 16450, fs=SR, output="sos"), x)


def record(dry):
    excess = band(dry - np.clip(dry, -1, 1), 140, 15700)
    top = signal.ellip(8, .2, 70, 15700, fs=SR, output="sos")
    mix = np.clip(signal.sosfilt(top, dry - excess), -1, 1)
    return low_pass(mix)


dry = scene()
out = record(dry)
persist_wave(out)
```